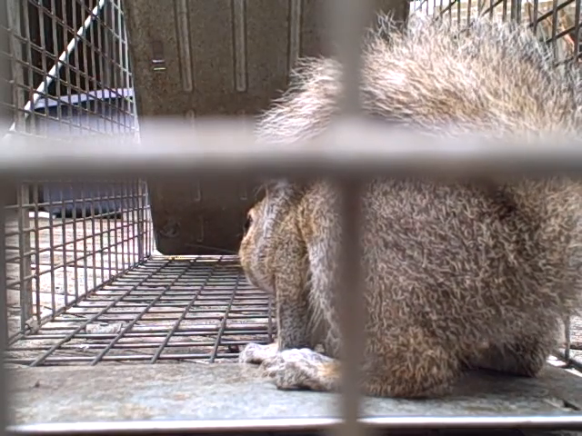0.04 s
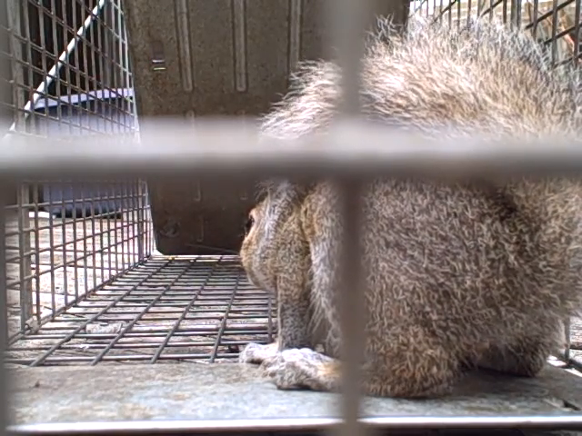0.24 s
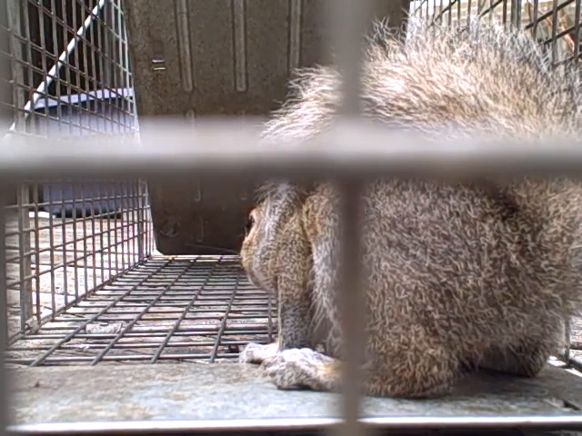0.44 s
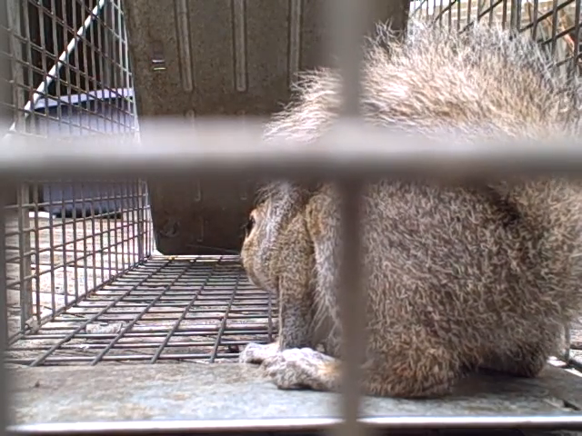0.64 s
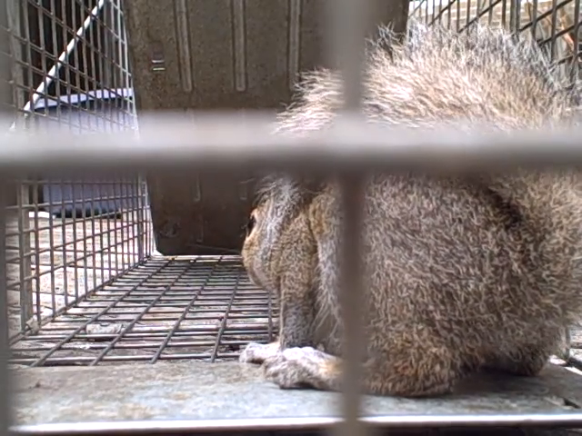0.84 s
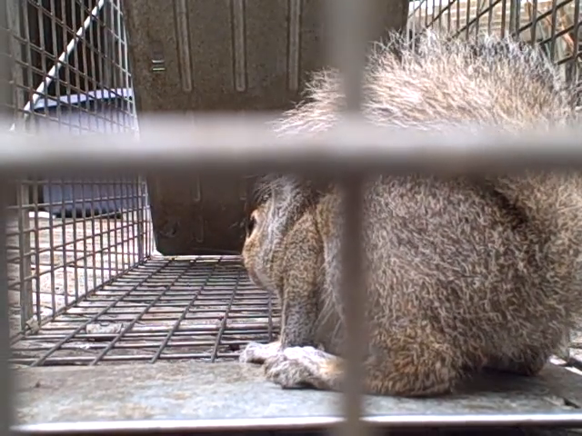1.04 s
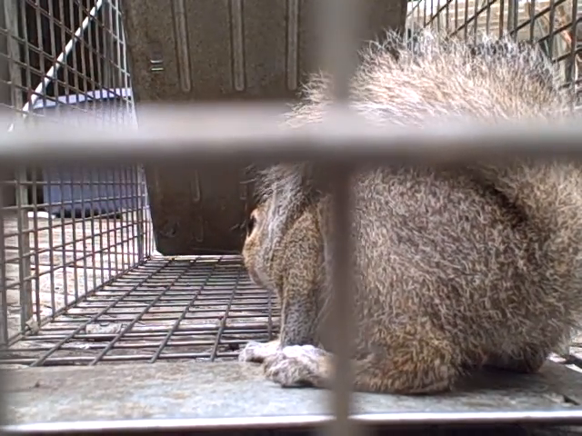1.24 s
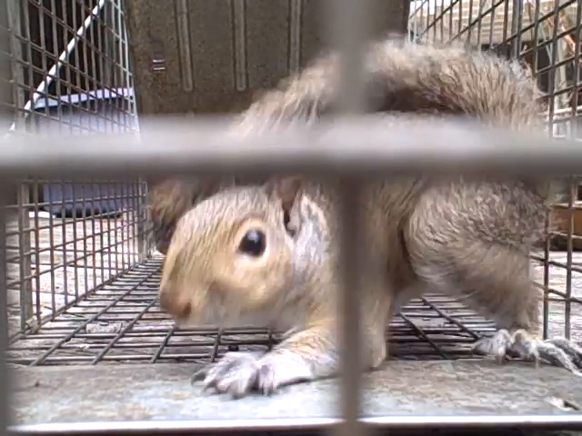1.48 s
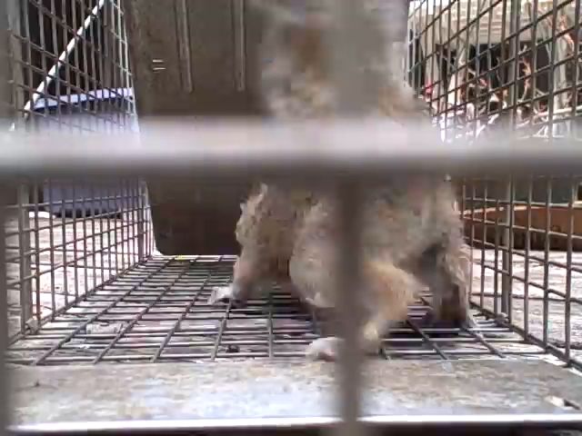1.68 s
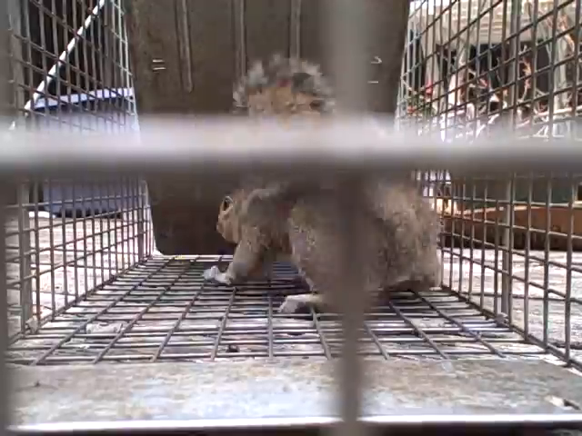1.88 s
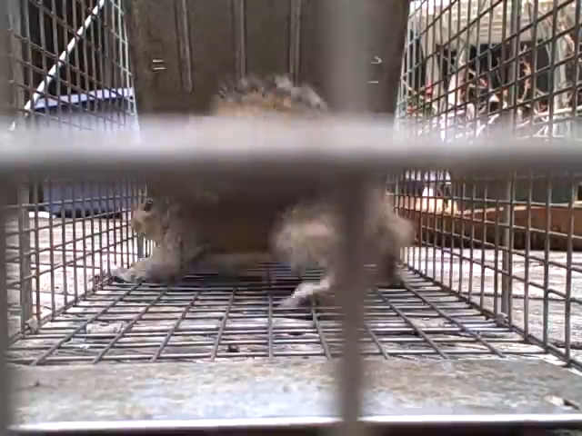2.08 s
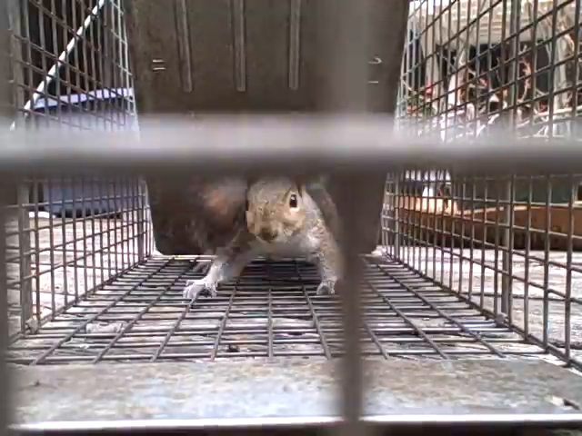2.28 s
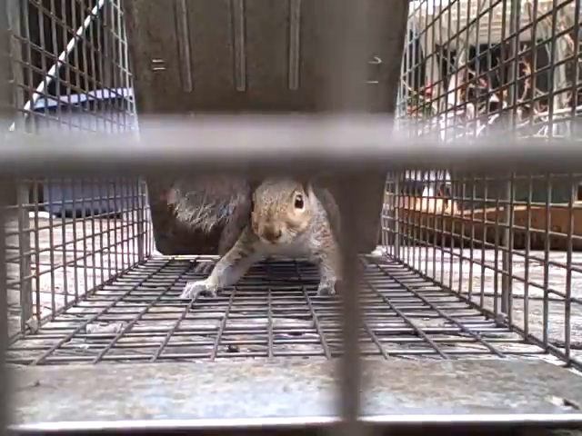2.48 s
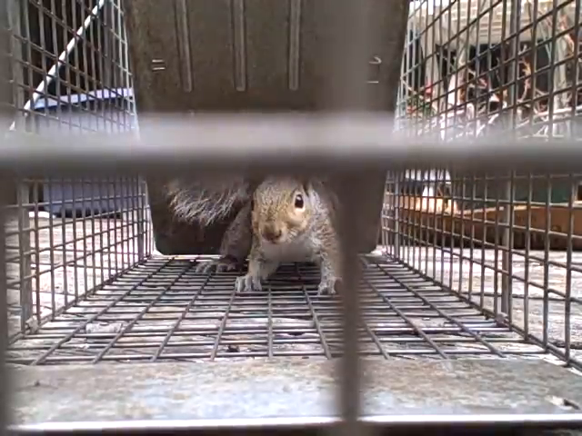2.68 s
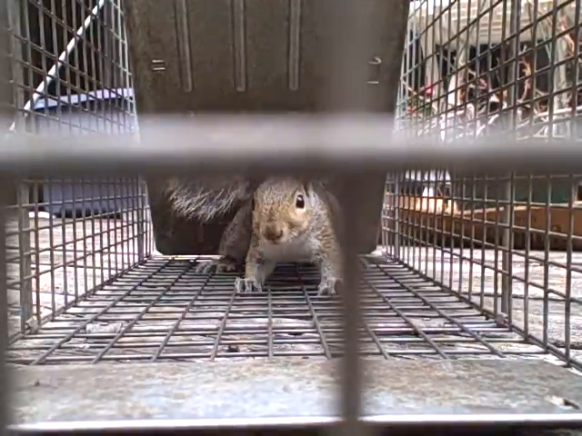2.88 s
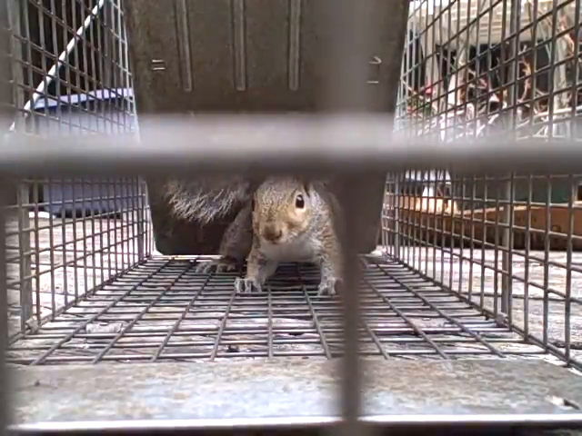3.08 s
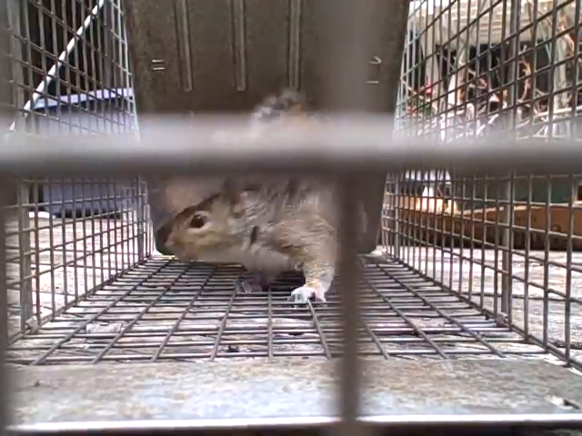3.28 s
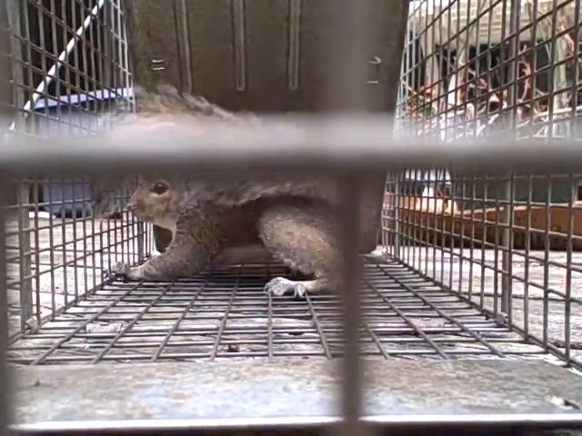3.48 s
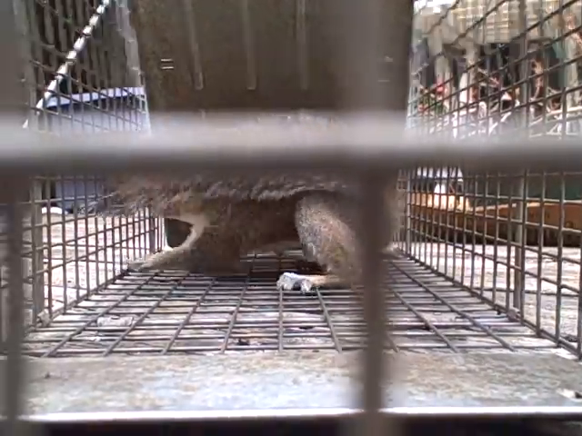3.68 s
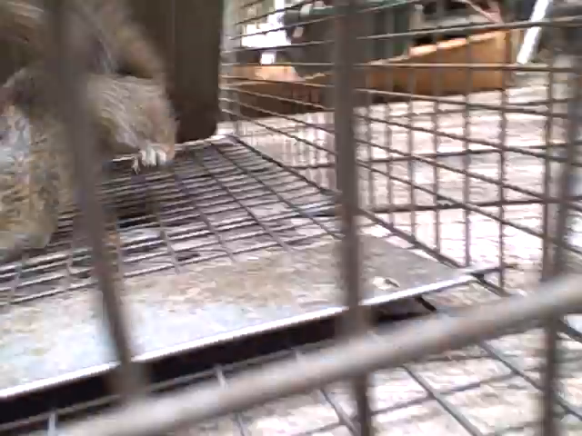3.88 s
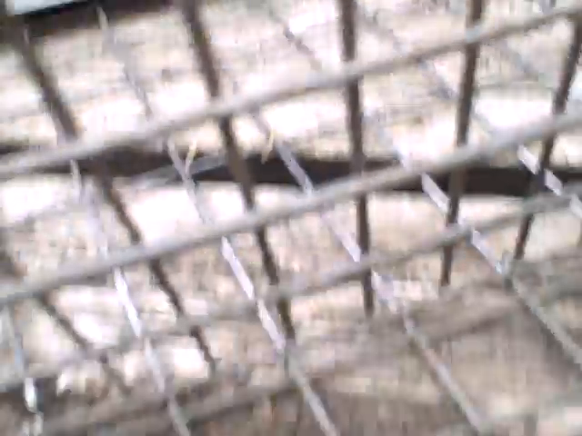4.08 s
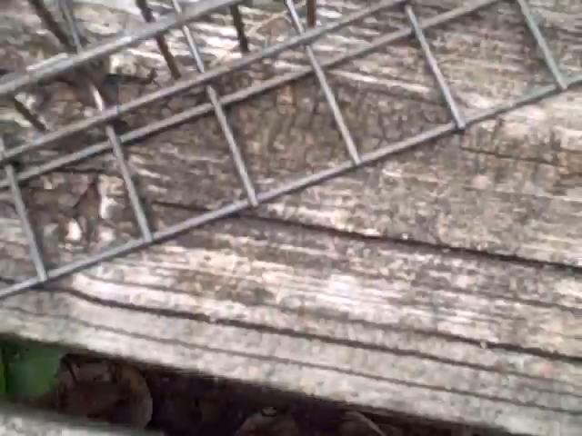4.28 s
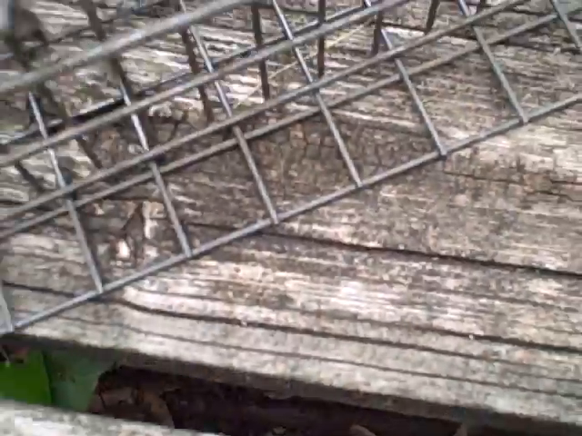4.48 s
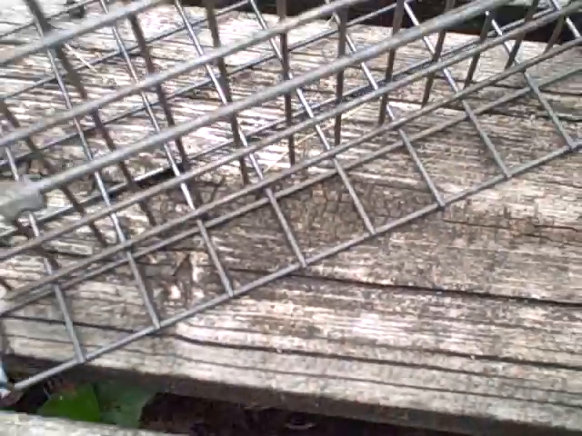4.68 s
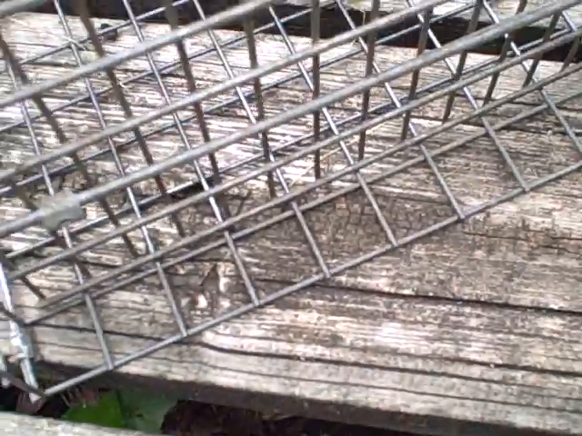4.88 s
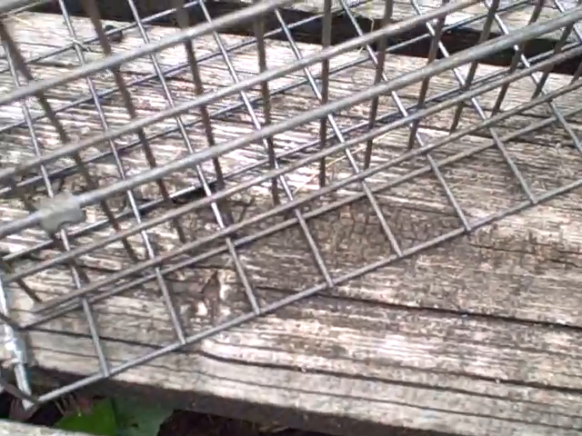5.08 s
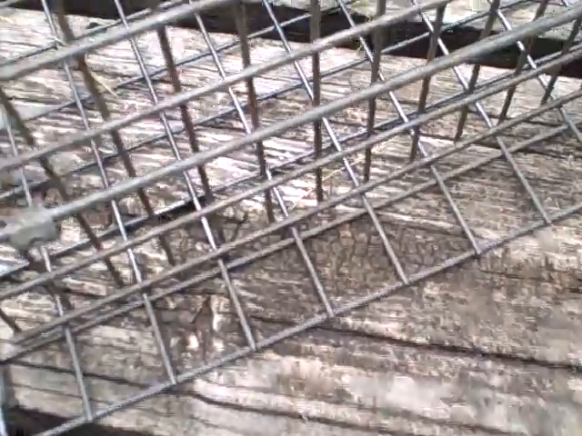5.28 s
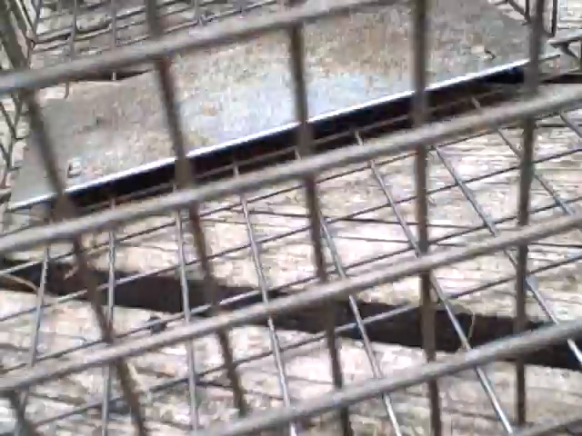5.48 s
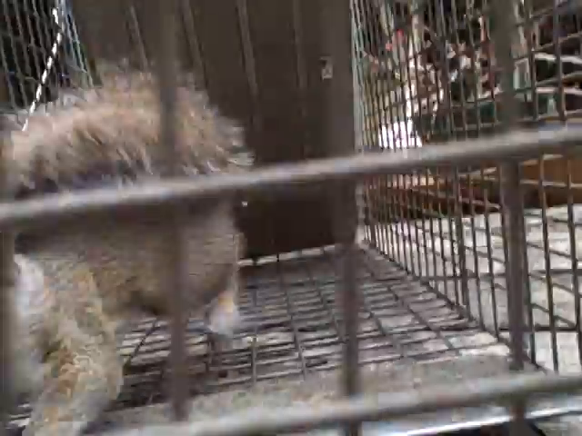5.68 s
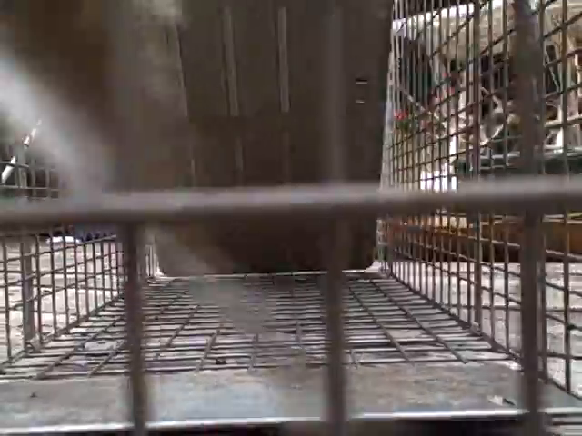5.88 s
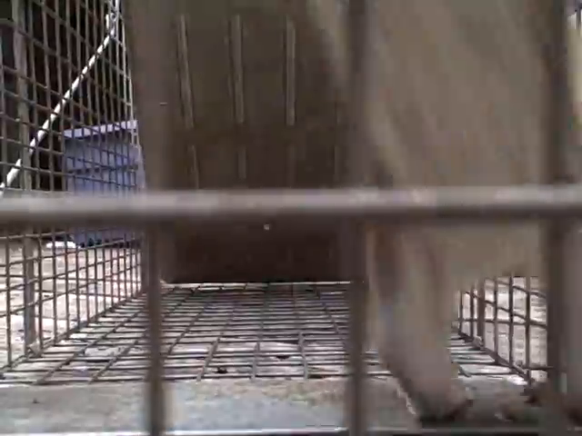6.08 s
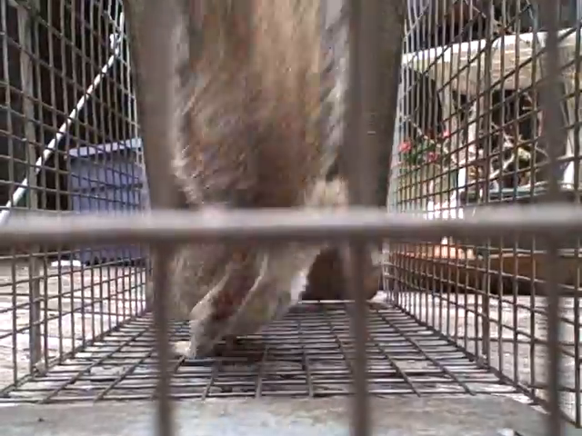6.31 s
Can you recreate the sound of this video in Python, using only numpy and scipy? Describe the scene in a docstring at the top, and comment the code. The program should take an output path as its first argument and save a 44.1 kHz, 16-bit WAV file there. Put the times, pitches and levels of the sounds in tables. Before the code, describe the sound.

A squirrel scrambles inside a wire cage trap, rattling and clashing the mesh in bursts, with knocks and faint distant birds.

```python
"""A squirrel darts about in a wire-mesh trap on a wooden deck, microphone against the mesh.
First, small birds call far off over a faint rumble; paws and the bumped microphone knock on the cage.
From 0.75 s, scrambling shakes the sheet-metal door, drums on the boards and rattles the mesh.
From 1.4 s, leaps make loose wires clash and ring; near 2 s, claws drag twice over the floor mesh.
At 5 s the moved microphone rubs on the cage and creaks. The hardest clash and knock come near 6 s."""
import sys
import numpy as np
from scipy import signal
from scipy.fft import rfft, irfft, next_fast_len
from scipy.io import wavfile

SR = 44100
rng = np.random.default_rng(int(sys.argv[2]) if len(sys.argv) > 2 else 0)


def waveform_to_disk(signal):
    """Save audio, clipped to [-1, 1], as 16-bit WAV at the path in sys.argv[1]."""
    frames = np.transpose(np.atleast_2d(signal))
    scaled = np.clip(frames, -1, 1) * 32767
    samples = np.round(scaled).astype(np.int16)
    wavfile.write(sys.argv[1], SR, samples)


N = 279770
RING_SAMPLES = 32768
TIME_S = np.arange(N) / SR
AGE_S = np.arange(RING_SAMPLES) / SR

# yard rumble: (frequency [Hz], gain [dB])
RUMBLE_SPECTRUM = [(15, -32), (25, -7), (59, 1), (188, -6.5), (267, -14.5), (552, -18), (614, -17.5),
                   (1080, -20), (1530, -25.5), (1660, -27.5), (3090, -30), (3630, -28.5), (15500, -40)]
# far birds: (start [s], length [s], start pitch [Hz], end pitch [Hz], level [dB])
BIRD_CALLS = [(-.09, 0.22, 3550, 3310, -58), (-.05, 0.098, 4100, 3780, -55), (-.01, 0.08, 3100, 2700, -60),
              (0.13, 0.094, 1100, 885, -59), (0.5, 0.11, 4460, 3700, -70), (1.082, 0.057, 2470, 2620, -70),
              (1.286, 0.12, 3500, 3760, -63.5)]
# paws and microphone on the cage:
# (time [s], level [dB], thud pitch [Hz], t60 [s], clack edge [Hz], clack re thud [dB])
CAGE_KNOCKS = [(0.061, -53.5, 700, 0.013, 2500, 10), (0.241, -56, 414, 0.11, 1390, 11.5),
               (0.784, -49, 386, 0.023, 1520, 7.5), (1.342, -19, 146, 0.057, 744, -17),
               (1.432, -35, 710, 0.039, 1290, -3), (2.75, -38, 193, 0.061, 700, -22),
               (2.993, -63, 900, .02, 7000, 8.5), (3.121, -71, 1200, .02, 5000, 8),
               (3.487, -16, 193, 0.021, 700, -7.5), (3.7439, -16.5, 118, 0.015, 4420, 3.5),
               (3.7681, -30, 197, 0.054, 1790, -1.5), (3.7905, -13.5, 323, 0.023, 1690, -4.5),
               (3.816, -18.5, 232, 0.011, 1200, -9.5), (5.922, -11, 158, 0.026, 700, -8.5),
               (5.9942, -5, 765, .008, 1400, -5), (6.161, -23.5, 2530, 0.027, 3050, -18),
               (6.249, -21, 804, 0.027, 1510, -6.5)]
# hollow clack of a knock: (frequency [Hz], gain [dB])
CLACK_SPECTRUM = [(400, -3), (700, 5), (1030, -4), (1300, 1.5), (1850, -3), (2200, -8.5), (3500, -9),
                  (4200, -13), (5000, -8), (8000, -2.5), (15000, -1)]
# push-offs and scrabbles: (time [s], hold [s], door drive [dB], deck re door [dB], mesh re door [dB])
PAW_PUSHES = [(0.753, 0.18, -57, 6.5, -7), (0.978, .03, -61.5, -3, -1.5), (1.152, .18, -71.5, 9, -18.5),
              (1.353, 0.12, -53.5, 9, -18), (1.456, 0.096, -51, -6, 2), (1.553, 0.13, -38.5, -6.5, -1.5),
              (1.827, 0.073, -41.5, -5.5, -5), (1.97, 0.23, -57.5, 4, -4.5), (2.142, 0.057, -36.5, -6, -2),
              (2.277, 0.013, -38.5, -8, -3.5), (2.468, 0.043, -46, -3, -3.5), (2.678, 0.83, -72, -9, 1),
              (3.334, 0.04, -46.5, -1, -6.5), (3.463, 0.014, -43, 3.5, -1.5), (3.613, 0.23, -60, 9.5, 0.5),
              (3.899, 0.075, -46.5, -1, -0.5), (4.09, 0.32, -59.5, 8, 2), (4.288, 0.065, -30.5, -29, -9),
              (4.365, 0.076, -35, -4.5, -1.5), (4.603, 0.038, -44, -3, 0), (4.789, 0.027, -53.5, 2, 1.5),
              (4.88, 0.27, -61.5, 4, -4), (5.334, .01, -52, -1, 0.5), (5.39, 0.28, -63.5, 2, -3),
              (5.554, .02, -45, -2, -5.5), (5.646, 0.011, -41.5, -4, -3), (5.744, 0.14, -31, -13, -10),
              (5.86, 0.014, -34, 6.5, 9), (5.923, 0.09, -35, -2.5, 1.5), (6.159, 0.011, -38.5, 2.5, 1.5),
              (6.22, 0.13, -47, -4, 3)]
# sheet-metal door: (frequency [Hz], gain [dB])
DOOR_SPECTRUM = [(130, -12), (250, 5), (370, 8.5), (480, -9), (640, 5), (830, 0), (1130, -3), (1400, -7),
                 (2200, -52)]
# deck boards: (frequency [Hz], gain [dB])
DECK_SPECTRUM = [(20, -17), (45, -14), (80, -1.5), (140, 0.5), (200, -2.5), (320, -41.5), (700, -32)]
# shaken mesh: (frequency [Hz], gain [dB])
RATTLE_SPECTRUM = [(700, -12.5), (1500, 3), (2800, 2), (4200, 1), (6500, 1.5), (9500, -3), (13000, -7.5),
                   (15700, -17)]
# wires that sing out of the mesh: (pitch [Hz], half width [Hz], relative lift [dB])
SINGING_WIRES = [(1880, 10, 8), (4880, 130, 3), (6083, 12, 6), (6389, 10, 5), (6583, 40, 8),
                 (7050, 450, -2), (8478, 12, 7), (8885, 30, 8), (9171, 80, 7), (9400, 60, 1),
                 (10461, 10, 5), (10732, 30, 5), (11102, 20, 3), (11850, 90, 0), (12855, 40, 7),
                 (13309, 10, 5), (13679, 25, 6), (14250, 300, 4), (14422, 10, 6)]
# loose wires clashing:
# (time [s], level [dB], ring t60 [s], dull ring trim [dB], struck wire pitch [Hz], its lift [dB])
WIRE_CLASHES = [(1.386, -52.5, 1.7, -7, 14420, 8), (1.4668, -34.5, 0.12, -6.5, 9400, 11),
                (1.507, -36.5, .18, -29, 13250, 6), (1.527, -25.5, .075, -13, 12800, 14.5),
                (1.552, -28.5, 0.22, -6.5, 9200, 6), (1.577, -33.5, 0.43, 0.5, 6700, 21),
                (1.651, -31, 0.15, -4, 14840, 14), (1.675, -23.5, 0.074, -9, 8940, 29),
                (1.849, -46, .55, -6, 9250, 17), (2.069, -47.5, 0.55, -9, 9100, 13),
                (2.1, -36.5, 0.84, -12, 8800, 16), (2.154, -31, 0.33, -4.5, 6800, 14),
                (2.226, -24.5, 0.2, -19, 14100, 26), (2.298, -34.5, 0.16, 3.5, 6930, -1),
                (3.33, -41, 0.92, -20, 9190, 19), (3.34, -25.5, .1, -15.5, 9250, 30),
                (3.458, -28, 0.22, -11, 9200, 25), (3.861, -39.5, 0.48, -17, 9200, 22),
                (4.143, -48, 0.14, 2, 8900, 21), (4.2207, -44.5, 0.52, -8, 6590, 6),
                (4.237, -38, 0.053, -7, 9900, 4), (4.286, -34, 1.0, -1, 6300, 10),
                (4.328, -20, 0.12, -8.5, 12900, 15.5), (4.344, -23, 0.3, -10, 13000, 25),
                (4.4178, -19.5, 0.17, -15, 15400, 10), (4.548, -35, 0.12, -19, 10550, 29),
                (4.5725, -22, .06, -12.5, 11840, 11), (4.733, -39, 0.06, -19, 9000, 4),
                (4.801, -39, 0.21, -9, 7250, 15), (4.991, -42.5, 0.39, -4.5, 9600, 0),
                (5.3202, -43.5, 0.44, -7.5, 6800, 21), (5.3374, -38.5, 0.08, -3, 6620, 12),
                (5.565, -39.5, 0.69, -9.5, 9900, 14), (5.607, -39, 0.38, -21, 9000, 29),
                (5.658, -37.5, .18, -10, 9100, 0), (5.725, -37, 0.43, -5.5, 6550, 15),
                (5.741, -28.5, 0.25, -1, 9000, -4), (5.813, -24, 0.26, -5.5, 9000, 10),
                (5.8755, -17, 0.14, -20, 12360, 2), (5.8804, -14, 0.25, -24, 12200, 14),
                (6.04, -30.5, .3, -2.5, 10600, 13), (6.1543, -31.5, .4, -4.5, 8990, -1),
                (6.2137, -26, 0.059, -16, 9500, 14), (6.235, -34, 0.39, -4, 14300, 8)]
# bright part of a clash: (frequency [Hz], gain [dB])
BRIGHT_SPECTRUM = [(2500, -24.5), (4500, -9.5), (6300, 0), (9000, 1), (11500, 1), (14000, -2), (15700, 0)]
# dull part of a clash: (frequency [Hz], gain [dB])
DULL_SPECTRUM = [(300, 5), (900, 5), (1500, -1), (3000, 8), (5000, -5), (7000, -11), (12000, -26)]
# partials excited with a struck wire: (frequency [Hz], level re its lift [dB])
STRUCK_PARTIALS = [(6620, -17), (9190, -10.5), (11850, -19), (14280, -3)]
# claws on the floor mesh: (start [s], end [s], slip rate [1/s], level [dB])
CLAW_DRAGS = [(1.739, 2.007, 41, -46), (2.313, 2.57, 43, -41)]
# cage resonances under the claws: (frequency [Hz], width [Hz], gain [dB])
CLAW_MODES = [(221, 24, -1), (447, 49, -5), (886, 48, -4), (1110, 190, -14), (4300, 2800, -29.5)]
# catches of the creak: (time [s], hold [s], level [dB])
CREAK_CATCHES = [(4.987, .008, -30), (5.002, 0.0093, -28)]
# creak resonances: (frequency [Hz], width [Hz], gain [dB])
RUB_MODES = [(505, 200, 4), (1140, 164, -1), (1480, 140, -4.5), (2120, 190, -32), (3140, 220, -18),
             (5160, 910, -17), (9600, 1200, -16.5)]


def from_db(db):
    """Decibels to gain."""
    return np.exp(np.asarray(db) * (np.log(10) / 20))


def unit_rms(x):
    """Scale to unit power."""
    return x / np.sqrt(np.mean(x ** 2) + 1e-20)


def gain_at(spectrum, hz):
    """Interpolate a spectrum over log frequency."""
    points = np.array(spectrum)
    return from_db(np.interp(np.log(hz + 1), np.log(points[:, 0]), points[:, 1]))


def decay(t60_s):
    """Exponential decay."""
    return np.exp(-np.log(1000) * AGE_S / t60_s)


def add(out, time_s, sound):
    """Mix a sound in at time_s."""
    start = max(round(time_s * SR), 0)
    out[start:start + len(sound)] += sound[:max(N - start, 0)]


def low_pass(x, hz, order=2):
    """Causal Butterworth low-pass."""
    return signal.sosfilt(signal.butter(order, hz, fs=SR, output="sos"), x)


def resonate(x, modes):
    """Parallel resonators, alternating in sign."""
    return sum((-1) ** k * from_db(db) * signal.lfilter(*signal.iirpeak(hz, hz / width_hz, fs=SR), x)
               for k, (hz, width_hz, db) in enumerate(modes))


def envelope(time_s, attack_s, hold_s, fall_db_per_s):
    """Linear rise, hold, exponential fall."""
    out, age_s = np.zeros(N), np.arange(2 * RING_SAMPLES) / SR
    rise = np.minimum(age_s / attack_s, 1)
    fall = from_db(-fall_db_per_s * np.maximum(age_s - attack_s - hold_s, 0))
    add(out, time_s, rise * fall)
    return out


def scatter_modes(low_hz, high_hz, count):
    """Mode frequencies scattered about an even spacing."""
    return low_hz + (high_hz - low_hz) * (np.arange(count) + rng.random(count)) / count


def wire_lift(modes_hz, lift_db, wires=SINGING_WIRES):
    """Gains that raise the modes near each wire's pitch."""
    return np.sqrt(1 + sum(from_db(db + lift_db) ** 2 * np.exp(-((modes_hz - hz) / width_hz) ** 2)
                           for hz, width_hz, db in wires))


def excite(modes_hz, gains):
    """Undamped modes at unit power; each contact point draws new strengths and phases."""
    lines = np.zeros(RING_SAMPLES // 2 + 1, complex)
    strengths = gains * from_db(rng.normal(0, 2.86, len(modes_hz)))
    phasors = np.exp(2j * np.pi * rng.random(len(modes_hz)))
    lines[np.round(modes_hz * RING_SAMPLES / SR).astype(int)] = strengths * phasors
    return unit_rms(irfft(lines))


def shake(drive, modes_hz, gains, hits_per_s, spread_db, thinning, t60_s, points):
    """Small random contacts at several points ring one mode set; weak drive thins them to ticks."""
    out, steady_db = np.zeros(N), -54
    density = np.clip(drive / from_db(steady_db), .1, 1) ** thinning
    for _ in range(points):
        hits = np.zeros(N)
        at = np.flatnonzero(rng.random(N) < hits_per_s / points / SR)
        size, polarity = rng.standard_normal((RING_SAMPLES, 2))[:len(at)].T
        hits[at] = from_db(spread_db * size.clip(-2, 2)) * np.sign(polarity)
        hits = unit_rms(hits) * (rng.random(N) < density) / np.sqrt(density)
        ring = (excite(modes_hz, gains) * decay(t60_s))[:RING_SAMPLES // 4]
        out += signal.oaconvolve(hits * drive, ring / np.linalg.norm(ring))[:N]
    return out / np.sqrt(points)


def yard_rumble(level_db):
    """Steady noise, mostly bass."""
    size = next_fast_len(N)
    hz = np.arange(size // 2 + 1) * SR / size
    spectrum = rfft(rng.standard_normal(size)) * gain_at(RUMBLE_SPECTRUM, hz)
    return from_db(level_db) * unit_rms(irfft(spectrum, size)[:N])


def birds(blur_hz, blur):
    """Gliding whistles, blurred by echoes over the long path."""
    out = np.zeros(N)
    for start_s, length_s, start_hz, end_hz, db in BIRD_CALLS:
        during = (TIME_S > start_s) & (TIME_S < start_s + length_s)
        progress = (TIME_S[during] - start_s) / length_s
        phase = 2 * np.pi * np.cumsum(start_hz + (end_hz - start_hz) * progress) / SR
        echoes = unit_rms(low_pass(rng.standard_normal((2, RING_SAMPLES)), blur_hz))[:, -len(phase):]
        whistle = (1 + blur * echoes[0]) * np.sin(phase) + blur * echoes[1] * np.cos(phase)
        out[during] += from_db(db) * np.sin(np.pi * progress) * whistle / np.sqrt(1 + 2 * blur ** 2)
    return out


def knocks(mesh_hz):
    """Thud plus hollow clack; a softer contact excites fewer high modes."""
    out = np.zeros(N)
    for time_s, db, thud_hz, t60_s, edge_hz, clack_db in CAGE_KNOCKS:
        fade = decay(t60_s) * (1 - np.exp(-AGE_S * edge_hz))
        gains = gain_at(CLACK_SPECTRUM, mesh_hz) / np.sqrt(1 + (mesh_hz / edge_hz) ** 4)
        clack = fade * excite(mesh_hz, gains)
        clack *= np.linalg.norm(fade) / np.linalg.norm(clack)  # the blow sets the energy
        thud = fade * np.sin(2 * np.pi * thud_hz * AGE_S)
        add(out, time_s, from_db(db) * (thud + from_db(clack_db) * clack))
    return out


def scrambling(attack_s):
    """Drive on door, deck and mesh; overlapping pushes add in power."""
    door = deck = mesh = 0
    for time_s, hold_s, db, deck_db, mesh_db in PAW_PUSHES:
        door += (from_db(db) * envelope(time_s, attack_s, hold_s, fall_db_per_s=111)) ** 2
        deck += (from_db(db + deck_db) * envelope(time_s, attack_s, hold_s, fall_db_per_s=108)) ** 2
        mesh += (from_db(db + mesh_db) * envelope(time_s, attack_s, hold_s, fall_db_per_s=121)) ** 2
    return np.sqrt([door, deck, mesh])


def door_clatter(drive, door_hz):
    """Shaken sheet metal rings briefly in the low midrange."""
    return shake(drive, door_hz, gain_at(DOOR_SPECTRUM, door_hz),
                 hits_per_s=350, spread_db=2, thinning=.4, t60_s=.074, points=5)


def deck_drumming(drive, deck_hz):
    """The boards under the trap answer in damped bass modes."""
    return shake(drive, deck_hz, gain_at(DECK_SPECTRUM, deck_hz),
                 hits_per_s=250, spread_db=1, thinning=.13, t60_s=.061, points=4)


def mesh_rattle(drive, mesh_hz, treble_edge_hz=4400, full_treble_db=-36):
    """The mesh chatters, brighter under harder drive."""
    gains = gain_at(RATTLE_SPECTRUM, mesh_hz) * wire_lift(mesh_hz, lift_db=-3)
    chatter = shake(drive, mesh_hz, gains,
                    hits_per_s=380, spread_db=3.5, thinning=.6, t60_s=.13, points=4)
    dull = low_pass(chatter, treble_edge_hz, order=1)
    treble_gain = np.clip(drive / from_db(full_treble_db), .01, 1) ** .24
    return dull + (chatter - dull) * treble_gain


def wire_clashes(mesh_hz, rise_s=.00031, struck_width_hz=310, partial_width_hz=320, medium_db=-32):
    """A clash snaps at the struck wire, spreads through the mesh and lingers in the singing wires."""
    out, steel = np.zeros(N), gain_at(BRIGHT_SPECTRUM, mesh_hz)
    partials = [(hz, partial_width_hz, db) for hz, db in STRUCK_PARTIALS]
    ring_lift, tail_lift = wire_lift(mesh_hz, lift_db=.5), wire_lift(mesh_hz, lift_db=2)
    for time_s, db, t60_s, dull_db, struck_hz, lift_db in WIRE_CLASHES:
        struck = wire_lift(mesh_hz, lift_db, partials + [(struck_hz, struck_width_hz, 0)])
        snap_db = 2.5 + .61 * (db - medium_db)  # harder clash, more snap
        snap = from_db(snap_db) * excite(mesh_hz, steel * struck) * decay(t60_s=.02)
        bright = excite(mesh_hz, steel * np.maximum(struck ** .55, ring_lift))
        dull = from_db(dull_db - 2.5) * excite(mesh_hz, gain_at(DULL_SPECTRUM, mesh_hz))
        tail = from_db(-24) * excite(mesh_hz, steel * tail_lift) * decay(t60_s=.78)
        swell = 1 - np.exp(-AGE_S / (rise_s * from_db(.63 * lift_db)))  # cleaner ring, slower rise
        add(out, time_s, from_db(db) * swell * (snap + (bright + dull) * decay(t60_s) + tail))
    return out


def claw_scrapes(jitter, slip_t60_s, grit):
    """Claws catch wire after wire; each slip is a tick and a short scratch."""
    out = np.zeros(N)
    for start_s, end_s, slips_per_s, db in CLAW_DRAGS:
        size = round((end_s - start_s) * SR)
        wander = unit_rms(low_pass(rng.standard_normal(size), hz=60))
        slip_count = np.cumsum(slips_per_s * (1 + jitter * wander)) / SR
        ticks = np.diff(np.floor(slip_count), prepend=0)
        scratch = signal.fftconvolve(ticks, decay(slip_t60_s))[:size] * rng.standard_normal(size)
        body = unit_rms(resonate(ticks + grit * scratch, CLAW_MODES))
        add(out, start_s, from_db(db) * body * signal.windows.tukey(size, .3))
    return out


def microphone_creak(jitter, roughness, grit, start_hz=610, sag_hz_per_s=2600):
    """Stick-slip against a wire: catches twice, the slips slowing as the rub stops."""
    age_s = TIME_S - CREAK_CATCHES[0][0]
    slip_hz = np.clip(start_hz - sag_hz_per_s * age_s, start_hz / 2, start_hz)
    wander = unit_rms(low_pass(rng.standard_normal(N), hz=250))
    slip_count = np.cumsum(slip_hz * (1 + jitter * wander)) / SR
    slips = np.diff(np.floor(slip_count), prepend=0) * (1 + roughness * rng.standard_normal(N))
    body = resonate(slips + grit * rng.standard_normal(N), RUB_MODES)
    pressure = np.max([from_db(db) * envelope(time_s, .004, hold_s, fall_db_per_s=517)
                       for time_s, hold_s, db in CREAK_CATCHES], axis=0)
    return unit_rms(body) * pressure


def scene():
    """Mono mix of cage, deck, handling and yard."""
    door_drive, deck_drive, mesh_drive = scrambling(attack_s=.0047)
    mesh_hz = np.append(scatter_modes(300, 16000, count=1100), np.array(SINGING_WIRES)[:, 0])
    door_hz = scatter_modes(130, 2200, count=170)
    deck_hz = scatter_modes(20, 500, count=90)
    wires = wire_clashes(mesh_hz)
    mesh = from_db(1.7) * mesh_rattle(mesh_drive, mesh_hz)
    door = from_db(.4) * door_clatter(door_drive, door_hz)
    deck = deck_drumming(deck_drive, deck_hz)
    claws = claw_scrapes(jitter=.3, slip_t60_s=.094, grit=.074)
    bumps = knocks(mesh_hz)
    creak = microphone_creak(jitter=.13, roughness=.27, grit=.078)
    yard = birds(blur_hz=201, blur=1.6) + yard_rumble(level_db=-57)
    return (yard + bumps + door + deck + mesh + wires + claws + creak)[None]


def record(dry):
    """Hard clip on the highest peaks, then a steep low-pass."""
    ceiling, cutoff_hz = .62, 15800
    top_cut = signal.ellip(12, .2, 70, cutoff_hz, fs=SR, output="sos")
    return signal.sosfilt(top_cut, np.clip(dry, -ceiling, ceiling))


dry = scene()
out = record(dry)
waveform_to_disk(out)
```